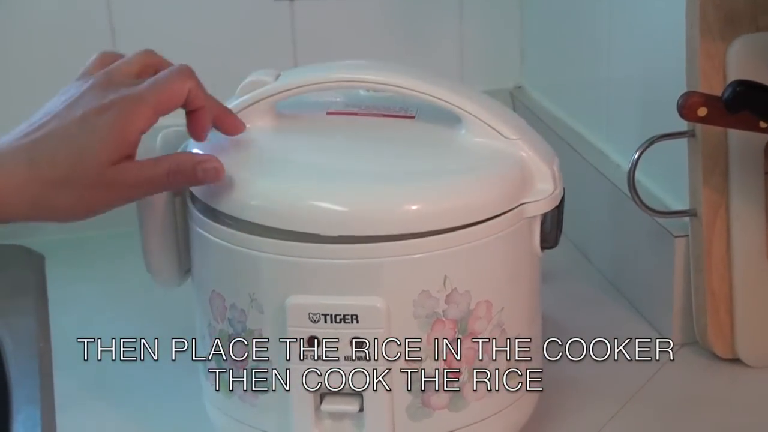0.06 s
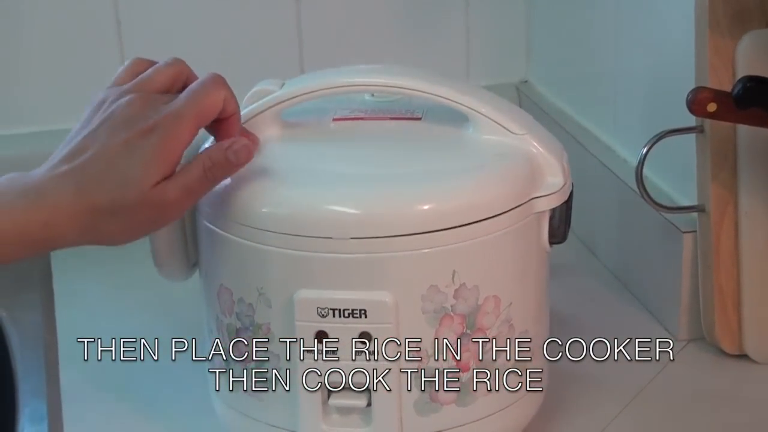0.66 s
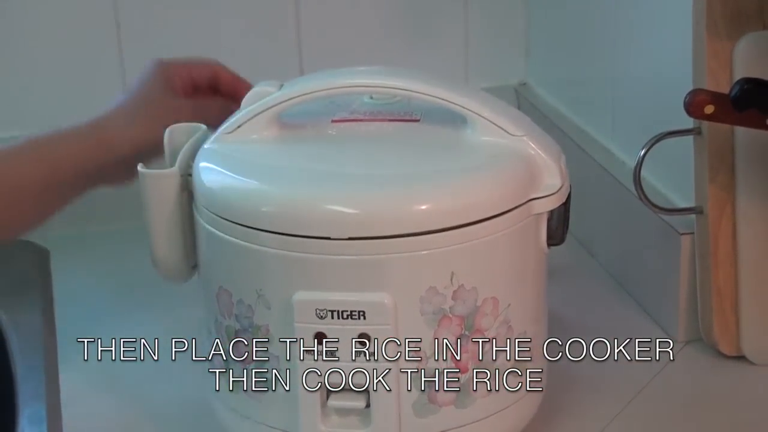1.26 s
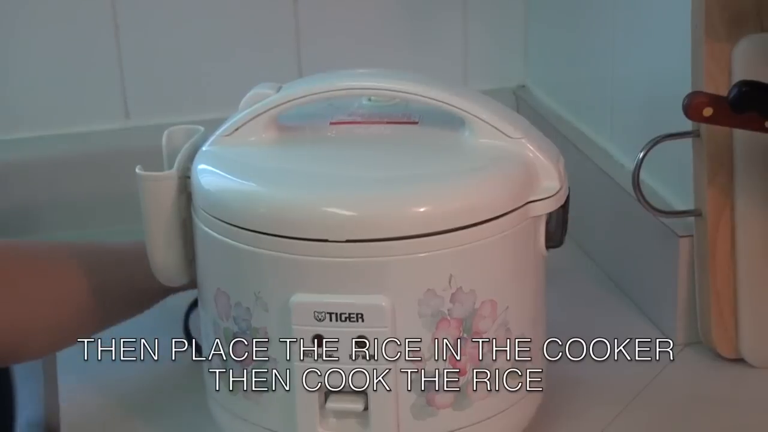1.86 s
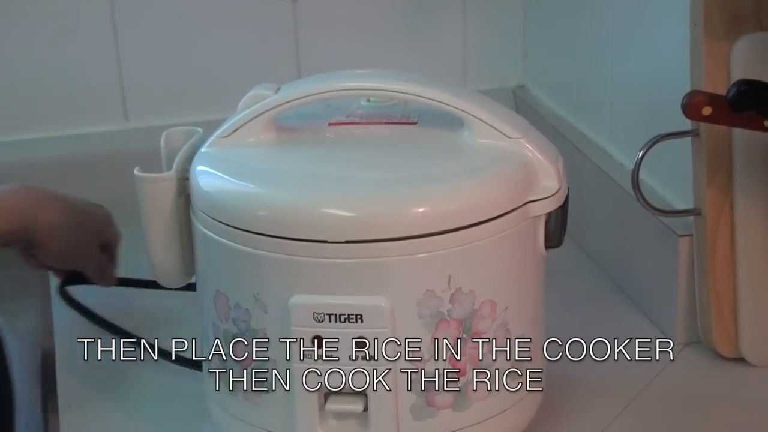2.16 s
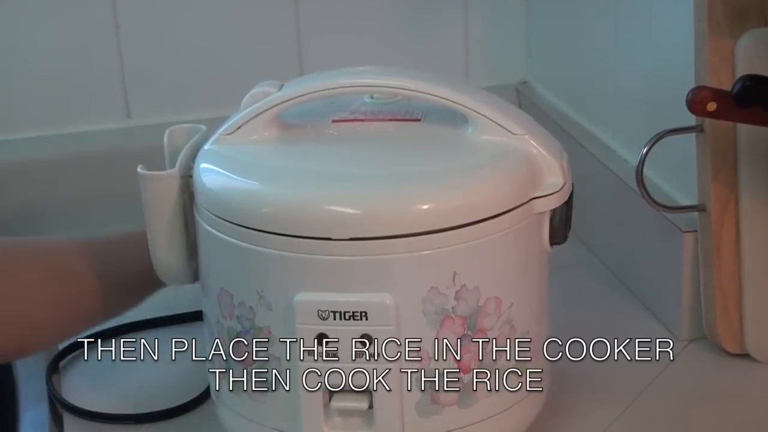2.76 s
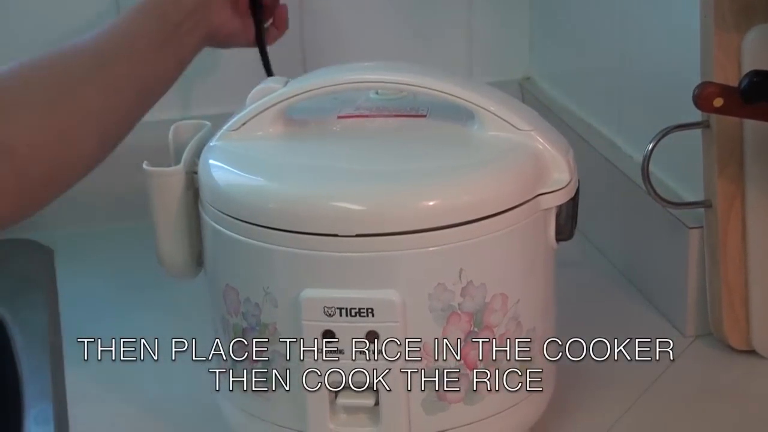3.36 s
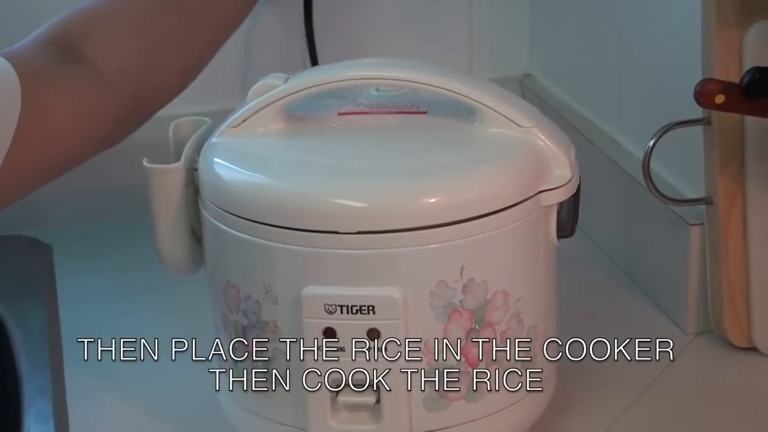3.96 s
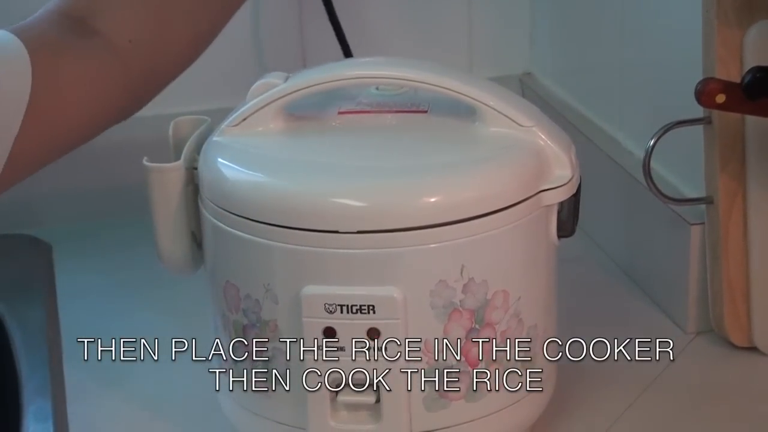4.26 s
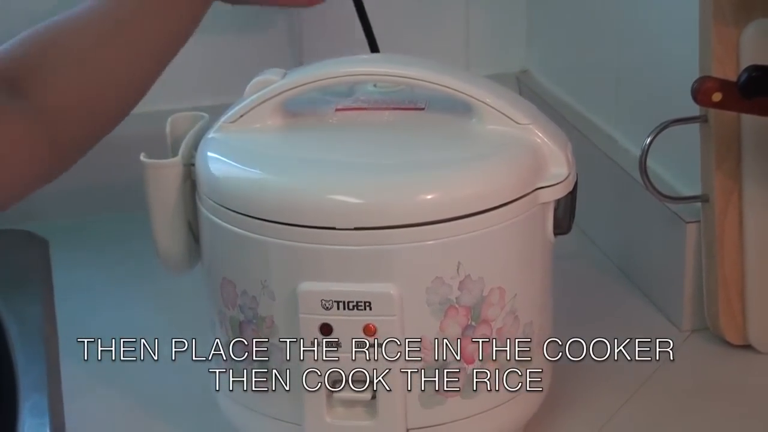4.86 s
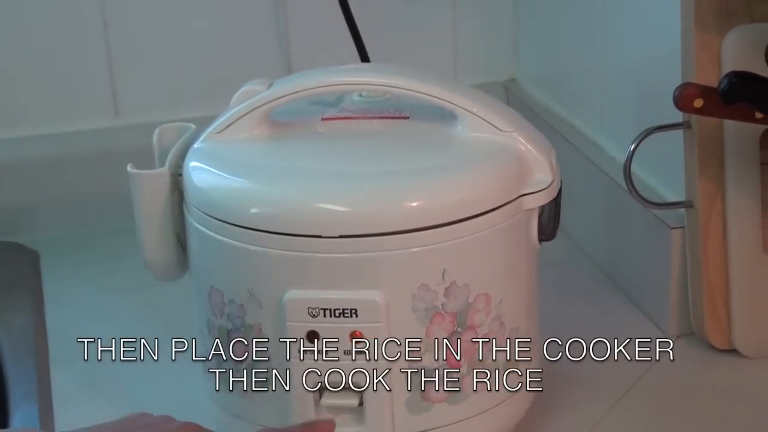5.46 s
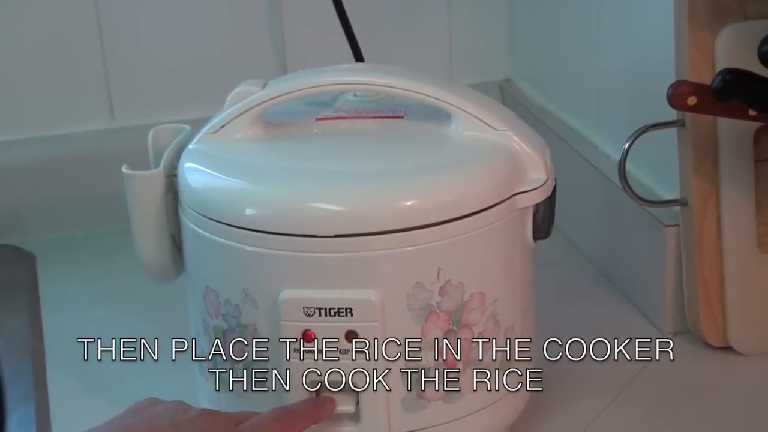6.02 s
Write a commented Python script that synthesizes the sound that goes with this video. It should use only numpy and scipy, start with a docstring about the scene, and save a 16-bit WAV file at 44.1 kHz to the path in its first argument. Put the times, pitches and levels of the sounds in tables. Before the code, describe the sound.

In a quiet kitchen, a cooker lid latches, a cord whirrs and knocks, and a switch gives a sharp double click.

```python
"""In a small tiled kitchen, the plastic lid of a rice cooker swings down, knocks on its rim and snaps
into the latch. Next the plug rattles and scrapes out of its recess, and the cord whirrs off its reel
and knocks about the case. Near 4.7 s the plug is pushed into the wall socket. Last, a finger touches
the cooking switch and presses it home with a sharp double click. Room air and a faint hum lie under
it all, and a thin whine comes and goes twice."""
import sys
import numpy as np
from scipy import signal
from scipy.fft import rfft, irfft
from scipy.io import wavfile

SR = 44100
rng = np.random.default_rng(int(sys.argv[2]) if len(sys.argv) > 2 else 0)


def pcm_store(signal):
    """Save signal as 16-bit PCM."""
    levels = np.round(np.clip(np.atleast_2d(signal), -1, 1) * 32767)
    wavfile.write(sys.argv[1], SR, levels.astype(np.int16).T)


N = 272979
TIME = np.arange(N) / SR

# Hits, where one thing touches another: t/s, level/dB, hardness (0 is soft, 1 is hard)
HINGE_HITS = [(.001, -26.5, 0.54), (.022, -36, 0.57)]
RIM_HITS = [(.4435, -33, 0.88), (.451, -25, 0.52), (.4555, -25, 0.54), (.4605, -25.5, 0.77)]
LATCH_HITS = [(.548, -40, 0.6), (.5512, -17, 0.62)]
FINGER_HITS = [(5.8975, -44.5, 0.43), (5.979, -48, 0.7)]
SWITCH_HITS = [(6.0988, -32, 0.855), (6.1078, -18.5, 0.95), (6.1115, -20, 0.1), (6.1155, -25.5, 0.3)]
CORD_HITS = [(1.8145, -40, 0.71), (1.819, -37, 0.068), (1.8835, -31.5, 0.81), (2.4522, -27.5, 0.58),
             (2.468, -31, 0.22), (2.4745, -31, 1), (2.492, -28.5, 0.94), (2.497, -31.5, 0.49),
             (2.523, -35.5, 0.5), (2.568, -37, 0.24)]
TAP_HITS = [(1.2255, -46, 1), (2.931, -41.5, 0.39), (3.218, -43, 0.44), (3.386, -41.5, 0.37),
            (3.425, -44.5, 0.32)]
TICK_HITS = [(.9695, -43.5, 0.62), (3.682, -45.5, 0.3), (3.870, -52, 0.72), (4.368, -51.5, .5),
             (4.502, -51.5, 0.56), (4.532, -51, 0.66), (4.574, -48, 0.62)]
BUMP_HITS = [(.834, -49, 0.64), (.864, -45.5, 0.29), (1.005, -49.5, 0.91), (2.942, -38.5, 0.47),
             (3.718, -46, 0.41), (3.890, -33.5, 0.43), (3.943, -35, 0.8), (4.1165, -44, 0.88),
             (4.540, -37.5, 0.39), (4.836, -36.5, 0.4), (4.847, -32.5, 0.1), (4.958, -45, 0.39)]
SOCKET_HITS = [(4.674, -44.5, .1), (4.6805, -39, 0.58), (4.687, -38, 0.64), (4.697, -40.5, 0.41),
               (4.847, -47, 0.58)]
PLUG_DRAGS = [(1.767, -34, 0.4)]   # slow: the plug leaves its recess
HAND_RUBS = [(1.985, -39.5, 0.62), (4.178, -35, 0.46), (4.500, -36.5, 0.49)]   # slow: the hand rubs along the case
# Clear notes a part rings with when hit: f/Hz, relative level/dB, time to fade by 60 dB (t60)/s
HINGE_NOTES = [(103, -6, 0.2), (456, 1, 0.085), (1502, -5, 0.09)]
CASE_NOTES = [(105.4, -17.5, 0.16), (213, -16, 0.15), (458, -13.5, 0.26), (511, -14.5, 0.18),
              (839, -7.5, 0.088), (1143, -19, 0.2), (1550, -26, 0.14), (1895, -18, 0.24)]
LATCH_NOTES = [(452, -14, .3), (2120, -20, .04), (3710, -16, .035), (5300, -18, .03), (6330, -17, .03)]
SWITCH_NOTES = [(369, -4, .07), (786, -12, .18), (1292, -4.5, .06), (2640, -6, .024), (2794, -15, .2),
                (3106, -15, .15), (4350, -13, .025), (5130, -8, .015), (9566, -17, .09)]
TAP_NOTES = [(600, -7, .03), (920, -4, .03), (1410, -5, .04)]
RECESS_NOTES = [(1660, -7, 0.083), (3026, -6, 0.061)]
SOCKET_NOTES = [(1690, -7, .025), (5290, -17, .02), (6540, -9, .011)]
WORKTOP_NOTES = [(36.2, -5, 0.98), (55, -2.5, 0.59), (100, -4.5, 0.28)]
# Tone colour, or how strong each sound is from bass to treble: f/Hz, relative level/dB
HINGE_COLOUR = [(47, -26.5), (80, -4), (219, -13.5), (461, -17), (797, -21), (1500, -17), (5130, -24.5),
                (15000, -46)]
RIM_COLOUR = [(80, -17), (150, 0.5), (240, 1.5), (330, -2), (460, 12), (630, -2), (830, 2.5), (1050, -5.5),
              (1800, -1.5), (2250, -21), (2800, -15), (4400, -14.5), (10000, -29), (15000, -39)]
LATCH_COLOUR = [(300, -11.5), (455, -2.5), (620, -7), (720, -0.5), (1120, 1.5), (1430, -9), (2070, -0.5),
                (2520, -11), (3200, -4), (4450, -7.5), (4800, -15), (5350, -7.5), (7900, -13),
                (8500, -19.5), (10500, -18), (13000, -27), (16000, -40)]
SWITCH_COLOUR = [(200, -14), (370, -3.5), (560, -9.5), (760, -3), (1600, -11.5), (2700, -9.5), (3500, -12),
                 (4400, -8), (8500, -16), (9800, -12), (13000, -22), (14500, -19), (16000, -32)]
PRONG_COLOUR = [(500, -0.5), (1400, 2), (6000, -2.5), (10500, -4), (15000, -26.5)]
RECESS_COLOUR = [(300, -12), (1100, -1.5), (1600, 1), (2300, -5), (3000, -5), (6000, -12.5), (12000, -20.5)]
REEL_COLOUR = [(120, -14.5), (235, -15), (285, 1.5), (345, -3.5), (480, -0.5), (730, -6.5), (835, 4.5),
               (1030, 0.5), (1150, -7.5), (1500, -16), (3000, -22), (8000, -49.5)]
SLIDE_COLOUR = [(300, 3), (1500, 5), (4000, -3), (10000, -5.5), (16000, -21)]
CORD_COLOUR = [(80, -29), (220, -28), (290, 1), (350, -22.5), (440, 10.5), (580, -2.5), (830, 3.5),
               (1400, -4.5), (2700, -4.5), (3800, -11.5), (8000, -23.5), (15000, -40)]
TICK_COLOUR = [(200, 2), (600, -3), (2200, 4), (5000, 8), (10000, 8), (15000, -13.5)]
SHUFFLE_COLOUR = [(70, -16), (260, 4.5), (500, -7.5), (1000, -10.5), (2500, -34.5)]
BUMP_COLOUR = [(80, -24), (270, 2), (580, -9.5), (900, -9), (1700, -25.5), (2300, -40.5), (15000, -64)]
SOCKET_COLOUR = [(300, -5.5), (800, -0.5), (1750, 0), (4400, -13), (5400, -9.5), (7200, -9), (10500, -21.5),
                 (12000, -34)]
AIR_COLOUR = [(12, -41), (20, 4), (70, -5.5), (301, -17), (328, -40), (367, -11.5), (422, -17), (590, -24),
              (678, -22.5), (1400, -24.5), (16000, -34.5)]
# Single short notes: t/s, f/Hz, level/dB
SEAL_SLAPS = [(.4437, 436, -33.5), (.4595, 196, -30)]   # the lid's seal slaps the rim and thuds on the hollow pot
SPRING_PINGS = [(4.851, 5220, -46), (5.897, 6340, -54.5)]   # small metal springs flick in the socket and on the switch lever
# Deep thumps through the worktop: t/s, level/dB
WORKTOP_THUMPS = [(1.663, -45), (2.689, -45.5), (2.771, -49), (4.84, -35.5)]
# Sounds that swell, hold and fade: hold start t/s, hold end t/s, level/dB
REEL_SWELLS = [(2.34, 2.54, -36.5)]
SLIDE_SWELLS = [(3.48, 3.58, -55), (4.52, 4.7, -56.5)]
ARM_SWELLS = [(1.69, 2.03, -51.5), (4.46, 4.57, -51.5), (4.87, 4.91, -52)]
WHINE_SWELLS = [(1.08, 1.42, -64), (5.05, 5.41, -63.5)]
# Tones of the appliance hum: f/Hz, level/dB
HUM_TONES = [(64.6, -61.5), (301.5, -68.5), (602.9, -66.5)]
# How long the kitchen echoes: f/Hz, t60/s
ECHO_TIMES = [(200, 0.36), (1500, 0.33), (4000, 0.35), (13000, 0.075)]
# Stereo width, or how much sound from the sides is let through: f/Hz, level/dB
SIDE_COLOUR = [(60, -35), (250, -19), (1000, -11), (2500, -11), (6000, -10.5), (11000, -45)]

THUD_HZ, CLICK_HZ = 563, 2900   # a hit is thud below these, knock between them and click above
RING_S, HIT_S = .4, .02   # time allowed for a hit to ring; time over which its level is counted
# From the softest hit to the hardest: bass lost, treble gained, how many times faster it builds
THUD_SWING_DB, CLICK_SWING_DB, BUILD_RATIO = 34.5, 12, 60


def lid():
    """The hinge clunks, the lid lands on its rim and rubber seal, and the latch snaps and chatters."""
    hinge = hits(HINGE_HITS, HINGE_COLOUR, HINGE_NOTES, ring_t60=0.19, crack=0.52,
                 thud_db=-4, click_db=-7.5)
    rim = hits(RIM_HITS, RIM_COLOUR, CASE_NOTES, ring_t60=0.05, crack=0.128,
               thud_db=-0.5, click_db=-11.5, build_s=0.0013)
    seal = pings(SEAL_SLAPS, t60=0.026)
    latch = hits(LATCH_HITS, LATCH_COLOUR, LATCH_NOTES, ring_t60=0.1, crack=0.06,
                 thud_db=-3.5, click_db=1.5, build_s=0.00023)
    bounces = rebounds(at_s=.5635, gap_s=.0098, db=-21, loss_db=2.06, hardness=0.4, count=5)
    chatter = hits(bounces, LATCH_COLOUR, LATCH_NOTES, ring_t60=0.15, crack=0.25,
                   thud_db=-11, click_db=3.5)
    return hinge + rim + seal + latch + chatter


def switch():
    """A finger taps the lever and muffles it; then the lever trips and slams against its magnet."""
    touches = hits(FINGER_HITS, SWITCH_COLOUR, [], ring_t60=0.07, crack=0.4,
                   thud_db=-16, click_db=-9, build_s=0.00081, click_swing_db=33)
    clicks = hits(SWITCH_HITS, SWITCH_COLOUR, SWITCH_NOTES, ring_t60=0.12, crack=0.1,
                  thud_db=-16, click_db=-8.5, build_s=0.00039, click_swing_db=39)
    return touches + clicks


def cord():
    """The reel whirrs as the cord runs out; it slides through the hand, knocks and ticks on the case."""
    pull = swells(REEL_SWELLS, rise_db_per_s=185, fall_db_per_s=162)
    whirr = pull * rustle(REEL_COLOUR, flicker_db=0.5, flicker_hz=120)
    movement = swells(SLIDE_SWELLS, rise_db_per_s=42, fall_db_per_s=52, rest_db=-61)
    slide = movement * rustle(SLIDE_COLOUR, flicker_db=1, flicker_hz=130)
    knocks = hits(CORD_HITS, CORD_COLOUR, CASE_NOTES, ring_t60=0.077, crack=0.28,
                  thud_db=-4, click_db=-13, build_s=0.00046)
    ticks = hits(TICK_HITS, TICK_COLOUR, [], ring_t60=0.077, crack=1,
                 thud_db=-30, click_db=-11, click_swing_db=42)
    return whirr + slide + knocks + ticks


def plug():
    """The hard little plug rattles its prongs, scrapes out of its hollow recess and taps the case."""
    bounces = rebounds(at_s=1.574, gap_s=.0145, db=-43.5, loss_db=3.5, hardness=0.76, count=4)
    rattle = hits(bounces, PRONG_COLOUR, [], ring_t60=0.046, crack=0.37,
                  thud_db=-14, click_db=2, build_s=0.00083)
    scrape = hits(PLUG_DRAGS, RECESS_COLOUR, RECESS_NOTES, ring_t60=0.23, crack=0.49,
                  thud_db=-9, click_db=-8, build_s=0.01)
    taps = hits(TAP_HITS, CORD_COLOUR, TAP_NOTES, ring_t60=0.13, crack=0.16,
                thud_db=-7.5, click_db=-10.5, detune=0.128)   # a different spot each time
    return rattle + scrape + taps


def socket_and_springs():
    """The prongs scrape into the socket; a spring pings there, and later one on the switch lever."""
    prongs = hits(SOCKET_HITS, SOCKET_COLOUR, SOCKET_NOTES, ring_t60=0.024, crack=0.14,
                  thud_db=-8.5, click_db=1, build_s=0.0019, click_swing_db=36)
    return prongs + pings(SPRING_PINGS, t60=0.018)


def handling():
    """The arm shuffles, and hand and plug rub and bump dully."""
    reach = swells(ARM_SWELLS, rise_db_per_s=133, fall_db_per_s=128, rest_db=-58.5)
    shuffle = reach * rustle(SHUFFLE_COLOUR, flicker_db=1, flicker_hz=31)
    rubs = hits(HAND_RUBS, BUMP_COLOUR, [], ring_t60=0.16, crack=1,
                thud_db=4, click_db=-16, build_s=0.0216)
    bumps = hits(BUMP_HITS, BUMP_COLOUR, [], ring_t60=0.12, crack=0.64,
                 thud_db=1, click_db=-12.5, build_s=0.0012, click_swing_db=-4)
    return shuffle + rubs + bumps


def worktop():
    """Pulling and pushing sets the heavy worktop booming briefly."""
    pushes = np.zeros(N)
    for at_s, db in WORKTOP_THUMPS:
        pushes[int(at_s * SR)] = from_db(db) * np.sqrt(HIT_S * SR)
    boom = energy_one(clear_ring(WORKTOP_NOTES, TIME[:SR]))
    return signal.fftconvolve(pushes, boom)[:N]


def background():
    """Room air, a faint appliance hum and a thin, unsteady whine that comes and goes."""
    air = from_db(-51.5) * rustle(AIR_COLOUR, flicker_db=2.45, flicker_hz=14)
    hum = sum(from_db(db) * rms_one(wavering_tone(hz, wobble=0.122)) for hz, db in HUM_TONES)
    thin_tone = rms_one(drift(45) * wavering_tone(hz=1296, wobble=2.2))
    whine = swells(WHINE_SWELLS, rise_db_per_s=219.5, fall_db_per_s=180) * thin_tone
    return air + hum + whine


def echoes(x, build_s):
    """Echoes off tiles and worktop build up quickly; each octave fades at its own pace."""
    t = np.arange(int(.7 * SR)) / SR
    edges_hz = 70 * 2. ** np.arange(9)
    tail = sum(cut(dense_ring(t, at_hz(ECHO_TIMES, np.sqrt(low * high))), [low, high], "band")
               for low, high in zip(edges_hz, edges_hz[1:]))
    fade_in = 1 - np.exp(-t / build_s)
    return signal.fftconvolve(x, energy_one(tail * fade_in))[:N]


def hits(rows, spectrum, notes, ring_t60, crack, thud_db, click_db,
         build_s=1 / SR, click_swing_db=CLICK_SWING_DB, detune=.008):
    """A hit is a crack, a short dense ring and any clear notes; harder ones are quicker and thud less."""
    t = np.arange(int(RING_S * SR)) / SR
    out = np.zeros(N + len(t))
    for at_s, db, hardness in rows:
        harder = np.clip(hardness, 0, 1) - .5   # the settings describe a hit of middle hardness
        contact_s = build_s / BUILD_RATIO ** harder
        shell = dense_ring(t, ring_t60 + 5 * contact_s)   # a soft contact rubs on for longer
        shell[1] += crack   # one sharp spike at the start
        ring = energy_one(colour(shell, spectrum)) + clear_ring(notes, t, detune)
        ring *= 1 - np.exp(-t / contact_s)
        upper = cut(ring, THUD_HZ, "high")
        balance_db = [thud_db - THUD_SWING_DB * harder, 0, click_db + click_swing_db * harder]
        thud, knock, click = energy_one(from_db(balance_db))
        hit = (thud * energy_one(cut(ring, THUD_HZ, "low"))
               + knock * energy_one(cut(upper, CLICK_HZ, "low"))
               + click * energy_one(cut(upper, CLICK_HZ, "high")))
        start = int(at_s * SR)
        out[start:start + len(t)] += from_db(db) * hit * np.sqrt(HIT_S * SR)
    return out[:N]


def rebounds(at_s, gap_s, db, loss_db, hardness, count):
    """Rows of hits for a loose part that bounces at an even pace, weaker each time."""
    return [(at_s + k * gap_s, db - k * loss_db, hardness) for k in range(count)]


def pings(rows, t60):
    """Each row sets one short note ringing."""
    t = TIME[:SR // 4]
    out = np.zeros(N)
    for at_s, hz, db in rows:
        start = int(at_s * SR)
        out[start:start + len(t)] += from_db(db) * np.sqrt(HIT_S * SR) * fading_note(t, hz, t60)
    return out


def clear_ring(notes, t, detune=0):
    """A part's notes ring together; the grip on it shifts each pitch by about the fraction detune."""
    ring = np.zeros(len(t))
    for hz, db, t60 in notes:
        sign = rng.choice([-1, 1])
        shifted_hz = hz * (1 + detune * rng.standard_normal())
        ring += sign * from_db(db) * fading_note(t, shifted_hz, t60)
    return ring


def dense_ring(t, t60):
    """So many notes overlap that they blur into a fading noise, equally strong at every pitch."""
    half_fade = fade(t, 2 * t60)   # applied twice
    spectrum = rfft(rng.standard_normal(len(t)) * half_fade)
    return energy_one(irfft(spectrum / np.abs(spectrum), len(t)) * half_fade)


def rustle(spectrum, flicker_db, flicker_hz):
    """Noise whose level flickers, as when tiny uneven slips shake a surface."""
    slips = rng.standard_normal(N) * from_db(flicker_db * drift(flicker_hz))
    return rms_one(colour(slips, spectrum))


def swells(rows, rise_db_per_s, fall_db_per_s, rest_db=-np.inf):
    """A volume curve that rises to each row's level, holds and falls back to rest."""
    power = from_db(rest_db) ** 2
    for start, end, db in rows:
        before_db = rise_db_per_s * np.maximum(start - TIME, 0)
        after_db = fall_db_per_s * np.maximum(TIME - end, 0)
        power = power + from_db(db - before_db - after_db) ** 2
    return np.sqrt(power)


def fading_note(t, hz, t60):
    """One pure tone that dies away, with a total energy of 1."""
    return energy_one(np.sin(2 * np.pi * hz * t) * fade(t, t60))


def wavering_tone(hz, wobble):
    """A tone that runs a little ahead or behind at random, by about wobble radians."""
    return np.sin(2 * np.pi * hz * TIME + wobble * drift(22))


def drift(rate):
    """A random curve of size about 1 that heads for a new value rate times a second."""
    points = rng.standard_normal(int(N / SR * rate) + 2)
    return np.interp(TIME * rate, np.arange(len(points)), points)


def colour(x, spectrum, size=4096):
    """Give a sound the tone colour in a table."""
    gains = from_db(at_hz(spectrum, np.fft.rfftfreq(size, 1 / SR)))
    cepstrum = irfft(np.log(gains))
    cepstrum[1:size // 2] *= 2   # fold it so that nothing rings before the sound starts
    cepstrum[size // 2 + 1:] = 0
    response = irfft(np.exp(rfft(cepstrum)))
    return signal.fftconvolve(x, response)[:len(x)]


def cut(x, hz, kind):
    """Keep only the "low" side, the "high" side or a "band" of a sound."""
    return signal.sosfilt(signal.butter(3, hz, kind, fs=SR, output="sos"), x)


def at_hz(points, hz):
    """Read between a table's rows, with the octaves evenly spaced."""
    points = np.array(points)
    return np.interp(np.log(np.maximum(hz, 1)), np.log(points[:, 0]), points[:, 1])


def fade(t, t60):
    """A smooth fade, 60 dB down after t60 seconds."""
    return np.exp(-np.log(1000) * t / t60)


def from_db(db):
    """Turn decibels into a number to multiply by."""
    return 10 ** (np.asarray(db) / 20)


def rms_one(x):
    """Scale to an average power of 1."""
    return x / np.sqrt(np.mean(x ** 2) + 1e-20)


def energy_one(x):
    """Scale to a total energy of 1."""
    return x / np.sqrt(np.sum(x ** 2) + 1e-20)


def scene():
    """The sources and their echoes; left and right differ only by sound scattered in from the sides."""
    sources = [(lid(), -6), (switch(), -6.5), (cord() + plug(), -6.5),   # sound, echo level/dB
               (socket_and_springs() + handling() + worktop(), -6.5)]
    direct = sum(sound for sound, _ in sources) + background()
    ahead, sideways = (sum(from_db(db) * echoes(sound, build_s=0.00065) for sound, db in sources)
                       for _ in range(2))
    scattered = signal.fftconvolve(direct, dense_ring(TIME[:SR // 4], t60=0.056))[:N]
    mid = direct + ahead
    side = colour(scattered + sideways, SIDE_COLOUR)
    return np.array([mid + side, mid - side])


def record(dry):
    """Cut away the very highest treble, above 15900 Hz."""
    return signal.sosfilt(signal.ellip(10, .1, 70, 15900, fs=SR, output="sos"), dry)


dry = scene()
out = record(dry)
pcm_store(out)
```